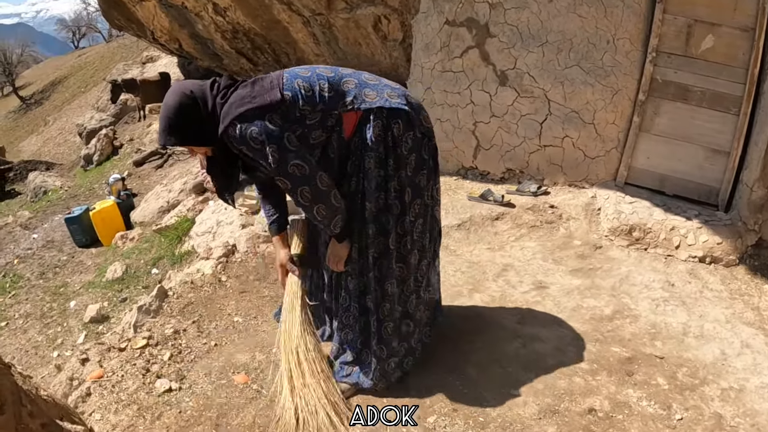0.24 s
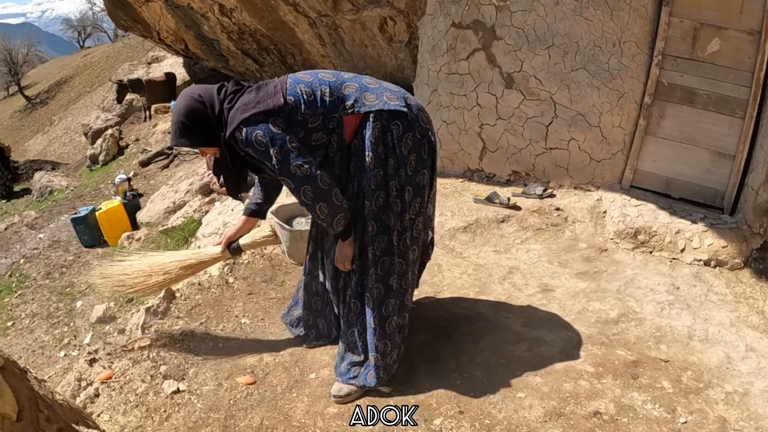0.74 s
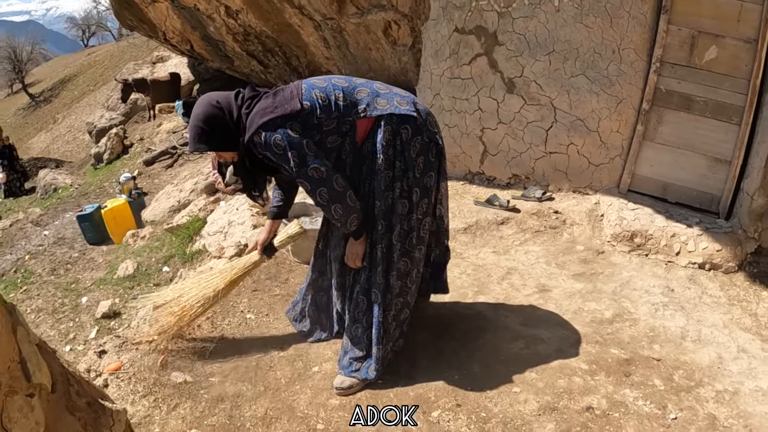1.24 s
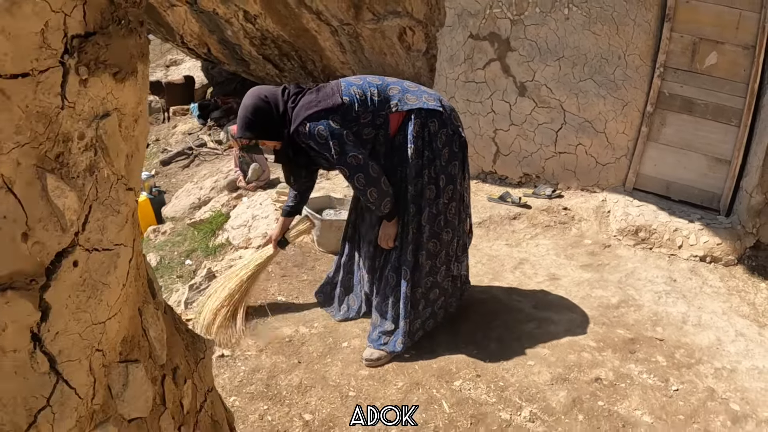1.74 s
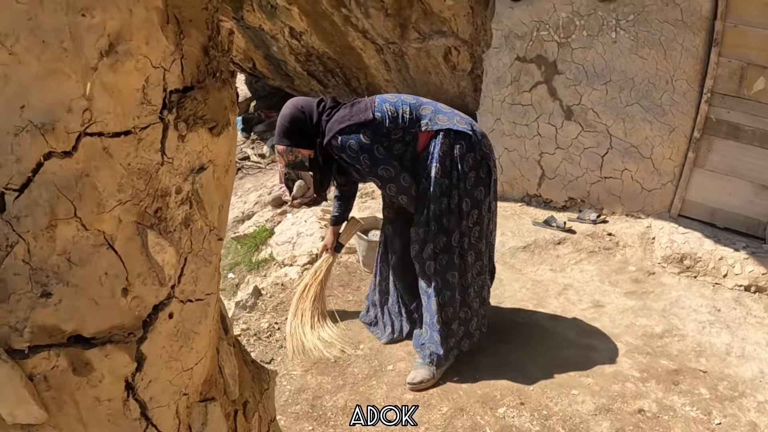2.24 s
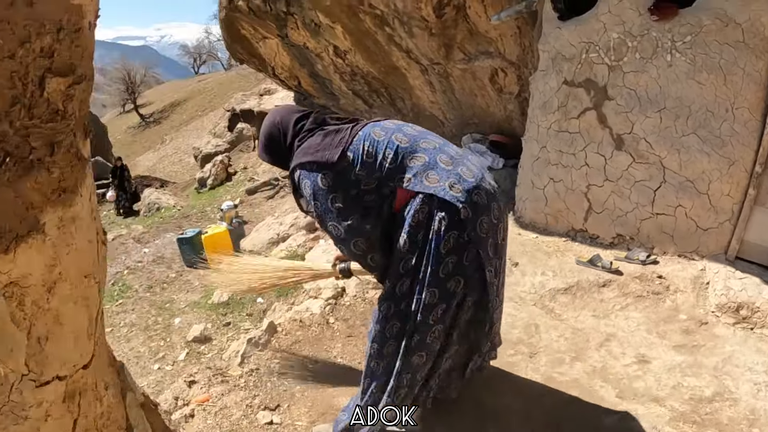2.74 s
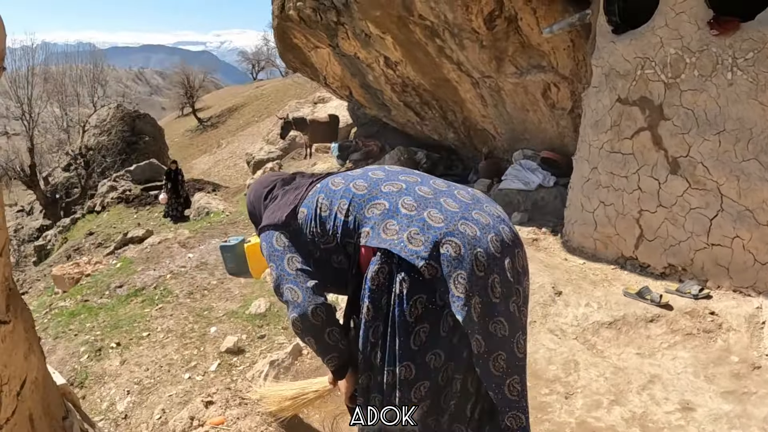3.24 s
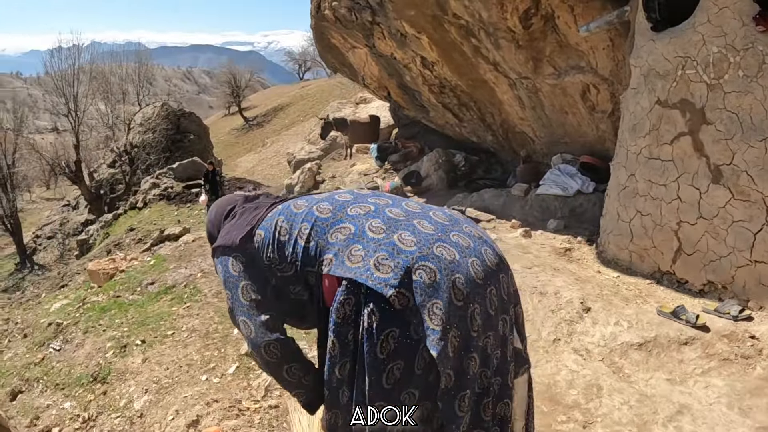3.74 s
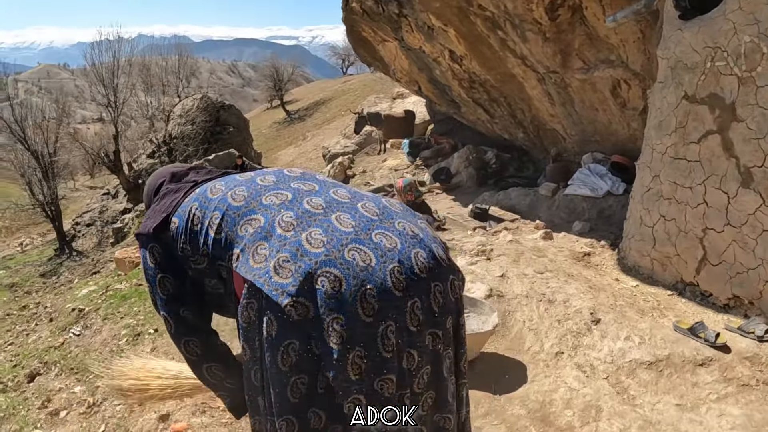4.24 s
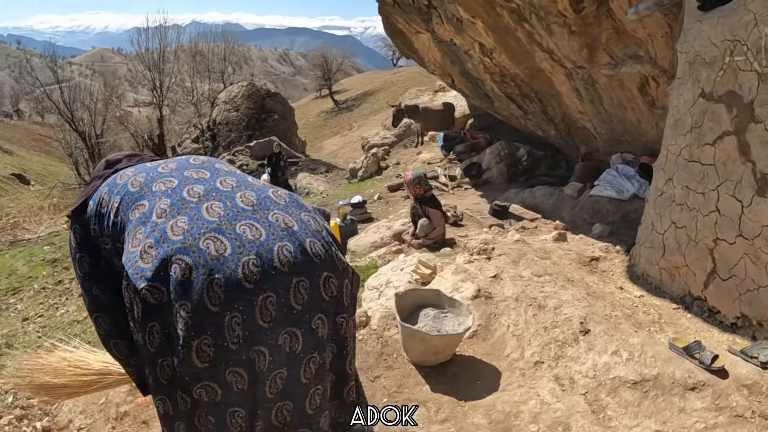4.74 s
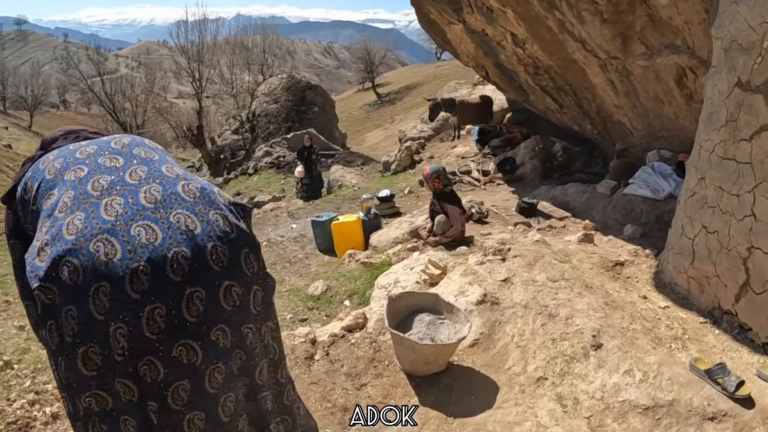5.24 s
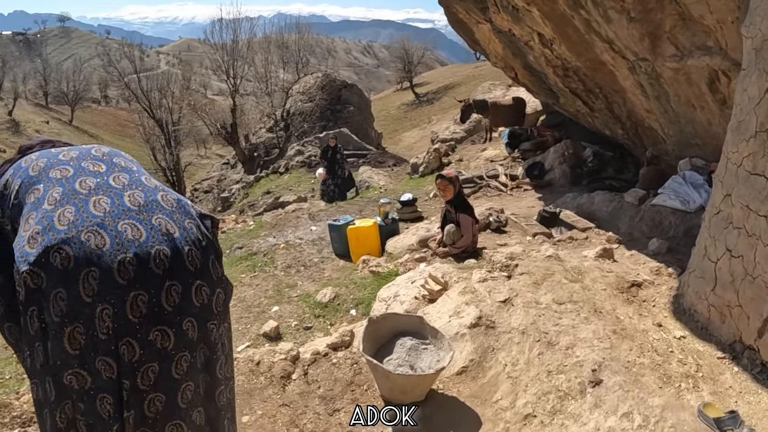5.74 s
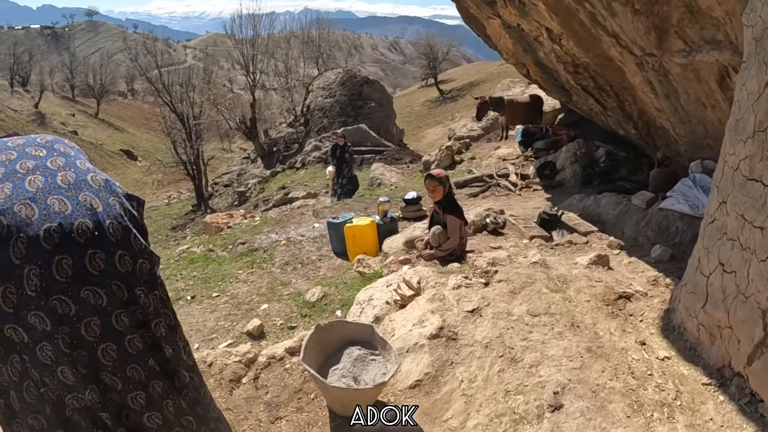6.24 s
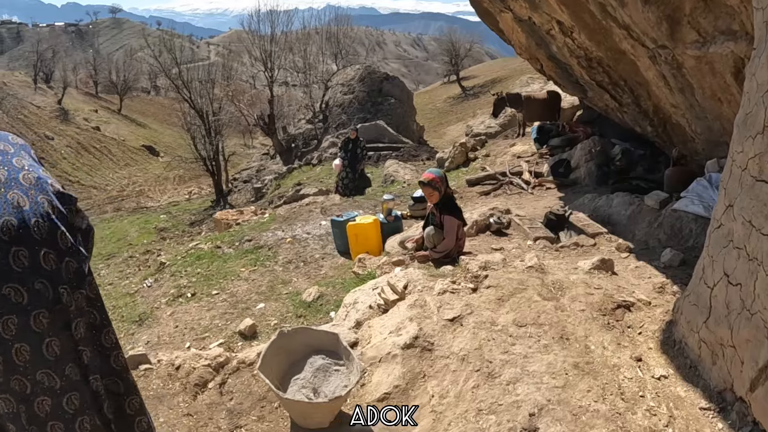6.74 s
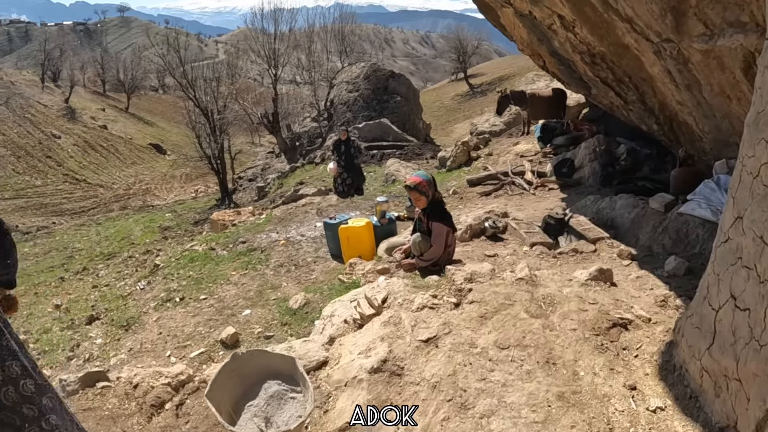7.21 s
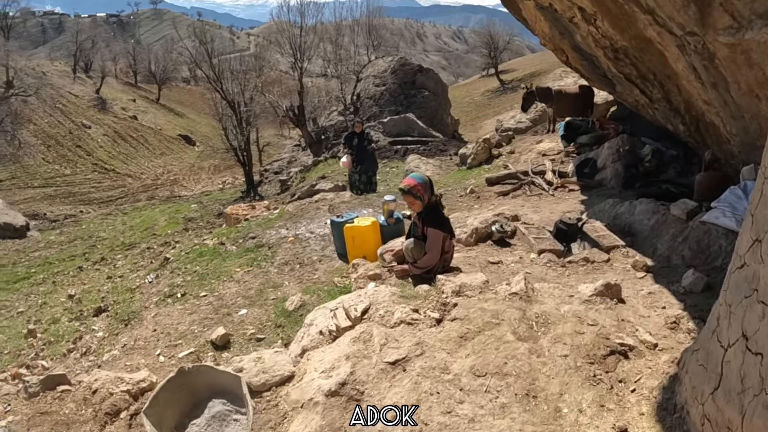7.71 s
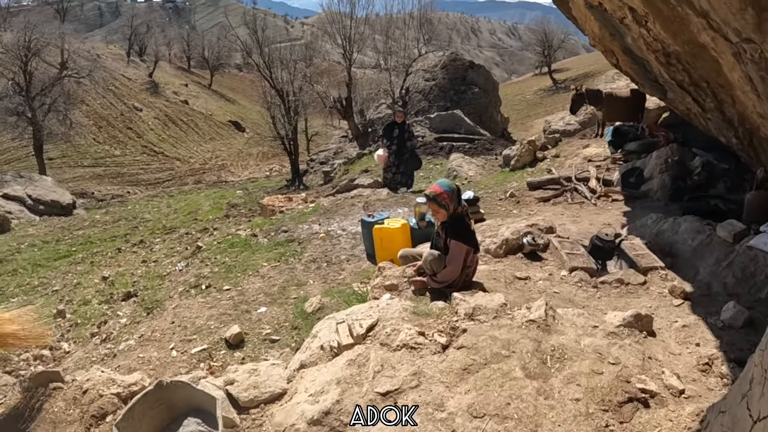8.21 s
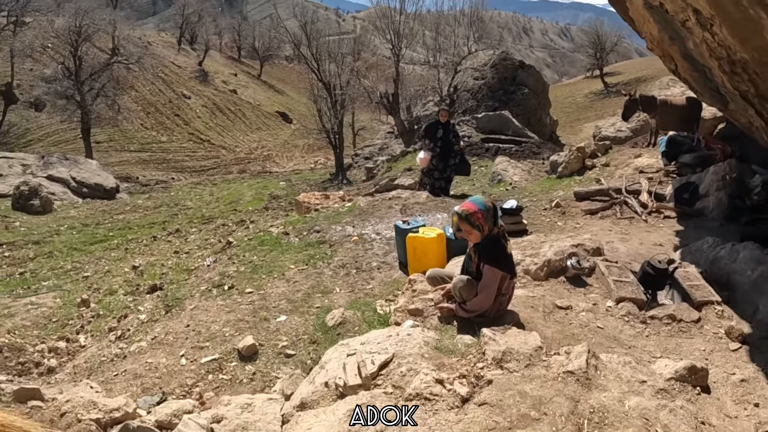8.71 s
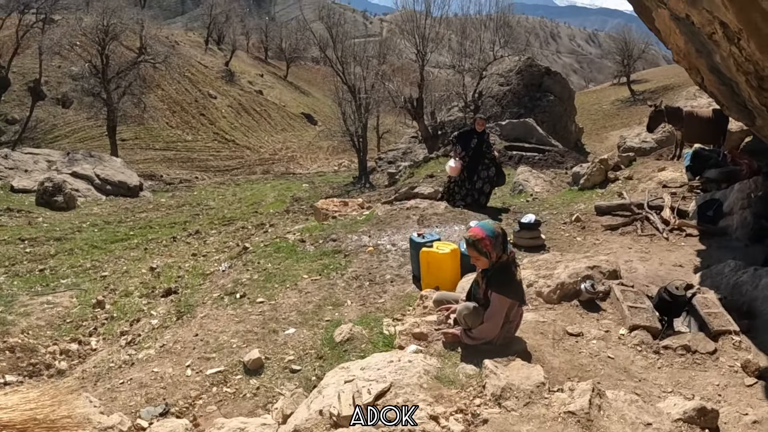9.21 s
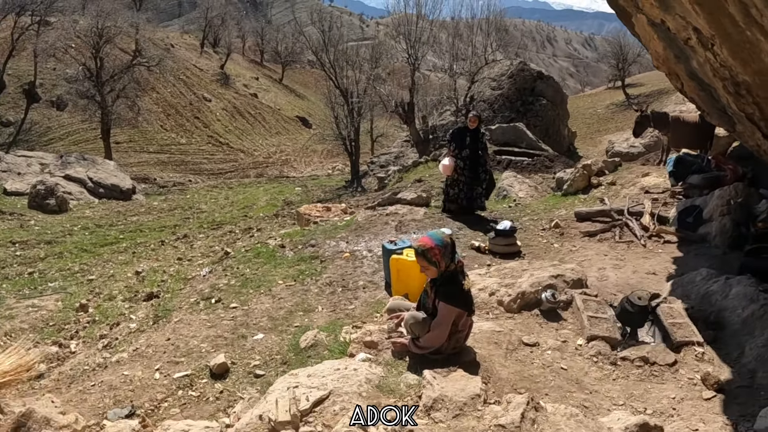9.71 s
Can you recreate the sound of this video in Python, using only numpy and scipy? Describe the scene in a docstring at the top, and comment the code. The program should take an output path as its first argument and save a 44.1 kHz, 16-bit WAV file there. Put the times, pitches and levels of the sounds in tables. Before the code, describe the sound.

Close, dry sweeping of stiff straw over loose dirt: bright gritty hiss with a coarser scrape beneath and tiny straw ticks. Strokes come irregularly, some long, some only short dabs. Stray pebbles snap, one rings briefly around six seconds, and clods thud more often near the end. A rock wall gives a very short scattered echo; low wind puffs bump the stereo microphone outdoors.

```python
"""Straw broom on dry dirt

A short straw broom sweeps dry dirt in quick strokes beside a rock wall, outdoors.
Shaped noise makes the grit's hiss, the deeper scrape and the fine dust; short blips tick as straws flick free.
Pebbles snap and clods thud as damped blips with loose crumbs, one hard pebble rings, and straws squeak
as wavering tones. The wall sends each blow back as a scattered echo.
Filtered noise gives light wind rumble on the microphones, ground rumble and a faint hillside murmur."""
import sys
import numpy as np
from scipy import signal
from scipy.fft import rfft, irfft, next_fast_len
from scipy.io import wavfile
from scipy.ndimage import uniform_filter1d, map_coordinates

SR = 44100
rng = np.random.default_rng(int(sys.argv[2]) if len(sys.argv) > 2 else 0)


def field_ratio(decibels):
    """Amplitude ratio for a level in dB (20 dB per decade); scalars and array-likes work."""
    return 10 ** (np.asarray(decibels, dtype=float) / 20)


def transcribe(signal):
    """Save signal, clipped to [-1, 1], as a 16-bit WAV file at the path in sys.argv[1]."""
    frames = np.atleast_2d(signal).T
    limited = np.clip(frames, -1, 1)
    pcm = np.round(limited * 32767).astype(np.int16)
    wavfile.write(sys.argv[1], SR, pcm)


N = 439236

# Broom strokes. Each row: touch-down in seconds, drag length in seconds, hiss in dB at the start,
# hiss in dB at the lift, deep scrape in dB over the hiss.
BROOM_STROKES = [(-0.2, 0.21, -55, -45.5, -9), (0.27, 0.36, -44.5, -38.5, -8), (0.949, .17, -49.5, -44, -9),
                 (1.08, 0.18, -50.5, -41, -8), (1.515, 0.33, -48, -40.5, -7),
                 (2.138, 0.33, -47.5, -42.5, -8.5), (2.69, 0.039, -46, -57.5, 2),
                 (2.9, 0.09, -59.5, -53, -4), (3.075, .26, -51, -37, -7.5), (3.688, 0.24, -49, -42, -9.5),
                 (3.96, 0.16, -52.5, -38, -8), (4.34, 0.09, -54, -53, 2), (4.47, 0.26, -52, -40, -5.5),
                 (5.048, 0.4, -47.5, -48, -5.5), (5.609, 0.25, -48, -44, -8), (6.02, 0.033, -45, -57, -3),
                 (6.18, 0.16, -50.5, -45, -7), (6.46, 0.13, -47.5, -43.5, -4.5),
                 (6.85, 0.18, -54.5, -50.5, -8), (6.96, .27, -45, -48, -7.5), (7.52, 0.31, -52, -46, -6.5),
                 (8.14, 0.1, -65, -57, -5.5), (8.42, 0.043, -49, -57, -3), (8.613, 0.14, -53, -35.5, -8),
                 (8.85, 0.31, -45.5, -49, -10), (9.24, 0.071, -47, -56, -12.5),
                 (9.359, 0.058, -48, -40.5, -8.5), (9.5, 0.23, -50, -42, -5)]
# Straws on grit. Each row: frequency in Hz, level in dB.
HISS_SPECTRUM = [(880, -31.5), (1500, -27.5), (1800, -39), (1930, -20.5), (2470, -9.5), (2950, -4.5),
                 (4670, -4), (6830, -4.5), (10000, -13), (13000, -34), (22000, -120)]
# Dirt dragged along. Each row: frequency in Hz, level in dB.
SCRAPE_SPECTRUM = [(210, -58), (350, -35), (384, -23.5), (618, -20), (841, -13), (1380, 0), (2200, -1),
                   (2860, -4), (4840, -120)]
# Finest dust. Each row: frequency in Hz, level in dB.
SPARKLE_SPECTRUM = [(4710, -21.5), (8000, -7), (9860, -11.5), (13300, -16), (14500, -37), (15600, -29)]
# Finest dust over time, at a hiss of -45 dB. Each row: time in seconds, level in dB over the hiss.
SPARKLE_LEVEL = [(0, -3), (2.4, -2), (3.3, -2.5), (4.8, -1.5), (5.2, -4.5), (6.6, -5.5), (8.4, -7),
                 (8.8, -2.5), (9.96, -3.5)]
# Place of the broom between the speakers. Each row: time in seconds, left over right in dB.
BROOM_PLACE = [(0, -0.5), (3, -1), (6.2, 0.5), (6.8, -1), (8.3, 2), (8.8, 2), (9.96, 0.5)]
# Wind on the microphones. Each row: frequency in Hz, level in dB.
RUMBLE_SPECTRUM = [(8.8, -23), (15, 15), (40, 6), (52, -19), (81, -43.5), (110, -40), (140, -66),
                   (240, -120)]
# Hard gusts. Each row: frequency in Hz, level in dB.
GUST_SPECTRUM = [(30, -42), (55, 5), (90, -15), (140, -10), (300, -33.5), (600, -120)]
# Puffs of wind. Each row: time of the peak in seconds, rumble in dB, time from the peak to 1/e power in seconds.
WIND_PUFFS = [(0.498, -41.5, 0.11), (0.73, -34.5, 0.048), (1.16, -50, 0.12), (1.464, -44, 0.087),
              (1.86, -44.5, 0.096), (2.305, -48, 0.074), (3.03, -53.5, 0.11), (4.32, -46.5, 0.09),
              (4.704, -43, 0.081), (5.316, -46, 0.13), (6.296, -41, 0.094), (6.633, -40.5, 0.067),
              (6.993, -41.5, .08), (7.805, -42, .04), (8.21, -55, 0.1), (8.6, -42, 0.09),
              (9.21, -51, 0.032), (9.585, -43, 0.093), (9.76, -40, 0.035), (9.902, -40, 0.038)]
# Ground rumble. Each row: frequency in Hz, level in dB.
GROUND_SPECTRUM = [(59, -44), (100, -35), (151, -4.5), (177, 2), (270, -6.5), (450, -17), (580, -12),
                   (990, -120)]
# Far hillside. Each row: frequency in Hz, level in dB.
MURMUR_SPECTRUM = [(180, -31), (300, 5.5), (828, -7), (1040, 6), (1470, -4), (6950, 1), (11900, -8),
                   (15000, -22)]
# Pebble snaps. Each row: first touch in seconds, level in dB, pitch in Hz, loose crumbs in dB.
PEBBLE_SNAPS = [(0.0878, -24, 6300, -17), (0.191, -33, 6000, -18), (0.233, -37, 9500, -14),
                (0.6252, -15, 5530, -22), (0.8912, -8, 4700, -15.5), (1.1292, -17.5, 3120, -17),
                (1.1344, -26, 4470, -22), (1.15, -26, 3490, -9), (2.7066, -36, 2720, 0),
                (2.7233, -25, 2700, -5), (2.917, -30, 6360, -17), (2.9656, -28.5, 5040, -10),
                (3.547, -24.5, 6250, -19), (4.3585, -34, 5080, -10), (4.9206, -23.5, 6560, -26),
                (4.9304, -22, 7000, -30), (5.0647, -30.5, 2160, -17), (5.628, -34, 6290, 0.5),
                (5.934, -29, 4930, -16), (7.421, -38, 7000, -20), (7.441, -27, 5200, -11),
                (7.4819, -32, 6130, -16), (8.003, -36, 1800, -12), (8.053, -38, 4500, -8),
                (8.103, -43.5, 2037, -14), (8.1911, -25.5, 1560, -24), (8.463, -31, 6000, -22),
                (8.5099, -25, 3100, -19), (8.6393, -33, 2500, -21), (9.39, -21.5, 6460, -9),
                (9.6002, -17.5, 1670, -6.5)]
# Thuds of the broom bundle on clods. Each row: first touch in seconds, level in dB,
# then the low, high and crack modes in dB over the middle one.
CLOD_THUDS = [(0.317, -48, -22, -5, 13), (0.623, -35.5, -5.5, -8, 3), (1.132, -41.5, -13, 1, -3),
              (4.651, -29.5, -2.5, -10, -8), (5.091, -50, -26, 2, 5), (5.8, -30, -6.5, 1, -13),
              (6.443, -48, -8, 1, -4), (6.91, -51, -19, 1, -3), (7.248, -42.5, -28, 5, 2),
              (8.191, -34, -8.5, -4, 7), (8.706, -34, -7.5, 2.5, -1), (9.15, -29.5, -15, -3, -4),
              (9.601, -25, -12, 1.5, 7.5)]
# Broom bundle on hard dirt, low to crack. Each row: mode in Hz, length in cycles, t60 of the crumbs in seconds.
BUNDLE_MODES = [(192, 1.8, 0.088), (520, 1.47, 0.05), (1184, 2.7, 0.035), (2300, 0.86, 0.02)]
# Soft low bumps, perhaps footfalls. Each row: start in seconds, level in dB.
SOFT_BUMPS = [(0.425, -39.5), (3.055, -47.5), (4.524, -44.5), (6.99, -48), (7.17, -45), (7.54, -52)]
# One hard pebble that rings. Each row: first touch in seconds, level in dB.
HARD_PEBBLE = [(6.1757, -19.5)]
# Modes of the hard pebble. Each row: frequency in Hz, level in dB, t60 in seconds.
PEBBLE_MODES = [(5850, -7, 0.017), (7180, 4.5, 0.0074)]
# Squeaks of straw on stone. Each row: start in seconds, level in dB, pitch in Hz, length in seconds.
STRAW_SQUEAKS = [(5.025, -48.5, 2020, 0.043), (6.399, -47.5, 1880, 0.052), (6.498, -46, 613, 0.049),
                 (6.547, -48, 1068, 0.061), (8.797, -44.5, 1805, 0.12)]
# Echo off the rock. Each row: frequency in Hz, t60 in seconds.
WALL_DECAY = [(200, 0.19), (2000, 0.064), (10000, 0.068)]
# Likeness of left and right. Each row: frequency in Hz, correlation from 0 to 1.
PAIR_LIKENESS = [(40, 0.85), (300, 0.63), (2000, 0.75), (8000, 0.85), (13000, 0.48)]
# Balance of the microphone pair. Each row: frequency in Hz, left over right in dB.
PAIR_BALANCE = [(40, -4.5), (200, -2), (1500, 0), (5000, 1), (12000, 5)]
# Treble steps of the microphones. Each row: frequency in Hz, level in dB.
TREBLE_SHELF = [(7500, -1), (8100, -4.5), (9800, -2.5), (10300, -4)]


def unit(x):
    """Scales a sound to rms 1."""
    return x / np.sqrt(np.mean(x ** 2) + 1e-20)


def along(points, hz):
    """Reads (Hz, value) points on a log frequency axis."""
    f, v = np.transpose(points)
    return np.interp(np.log(hz + 1), np.log(f + 1), v)


def curves(rows):
    """Draws one value per sample for each column after the time."""
    s, *cols = np.transpose(rows)
    return [np.interp(np.arange(N) / SR, s, c) for c in cols]


def wobble(rate):
    """A smooth random curve with rate knots a second."""
    knots = rng.standard_normal(int(N * rate / SR) + 4)
    return map_coordinates(knots, [np.arange(N) * rate / SR])


def filtered(x, response):
    """Shapes x by a gain that depends on frequency."""
    m = next_fast_len(N + 8192)
    return irfft(rfft(x, m) * response(np.fft.rfftfreq(m, 1 / SR)), m)[..., :N]


def sides(pan_db):
    """Left and right gains for a left-over-right level."""
    return field_ratio(np.array([pan_db / 2, -pan_db / 2]))


def spread(pair, spectrum):
    """Colours two unrelated signals and mixes them to the likeness of the microphone pair, rms 1."""
    def mid_side(hz):
        turn = np.arccos(np.clip(along(PAIR_LIKENESS, hz), -1, 1)) / 2
        return field_ratio(along(spectrum, hz)) * [np.cos(turn), np.sin(turn)]
    mid, side = filtered(pair, mid_side)
    return unit(np.array([mid + side, mid - side]))


def grit(spiky_db, patchy_db):
    """Dense contacts, a few much larger than the rest, in patches of pitch and time."""
    sizes = field_ratio(spiky_db * np.minimum(rng.exponential(size=N), 6))  # the cap is the coarsest grit
    z = signal.stft(sizes * rng.standard_normal((2, N)), nperseg=256)[2]
    patches = uniform_filter1d(rng.standard_normal(z.shape[1:]), size=5, axis=0)  # over pitch
    patches = uniform_filter1d(patches, size=9, axis=1)  # over time
    return signal.istft(z * field_ratio(patchy_db * unit(patches)), nperseg=256)[1][:, :N]


def blip(hz, cycles):
    """A contact too damped to ring: a short sine under a smooth hump."""
    u = np.arange(round(3 * cycles * SR / hz)) * hz / SR / cycles
    hump = (np.e * 2 * u * np.exp(-2 * u)) ** 2
    return np.sin(2 * np.pi * cycles * u) * hump


def strokes():
    """Hiss level and scrape share: strokes land, change evenly, then fade fast as some dust settles slowly."""
    s, drag, first_db, last_db, scrape_db = np.transpose(BROOM_STROKES)[:, :, None]
    clock = np.arange(0, N + 64, 64) / SR
    t = np.maximum(clock - s, 0)
    after_lift = np.maximum(t - drag, 0)
    landing = 1 - np.exp(-(t / 0.024) ** 0.82)  # time constant in seconds
    press = field_ratio(first_db + (last_db - first_db) * np.minimum(t / drag, 1))
    fade = field_ratio(-100 * after_lift) + field_ratio(-19.5 - 24 * after_lift)  # straws, then dust, in dB per second
    power = (landing * press * fade) ** 2
    total = power.sum(axis=0) + 1e-9
    share_db = (power * scrape_db).sum(axis=0) / total
    return curves(np.transpose([clock, 10 * np.log10(total), share_db]))


def ticks(per_s, spiky_db):
    """Single straws flick free: sparse blips in four sizes, per_s of each size, rms 1."""
    flicks = (rng.random((4, N)) < per_s / SR) * field_ratio(spiky_db * rng.standard_normal((4, N)))
    pitches_hz = [1510, 2620, 4360, 6800]
    return unit(sum(signal.fftconvolve(f, blip(hz, cycles=1.3))[:N] for f, hz in zip(flicks, pitches_hz)))


def broom(hiss_db, press_db):
    """Straws drag over grit; bundles of straws catch unevenly, so the level flutters."""
    sparkle_db, = curves(SPARKLE_LEVEL)
    effort_db = hiss_db + 45
    sway = sides(curves(BROOM_PLACE)[0] + 0.6 * wobble(3))
    catch_db = 0.96 * wobble(14) + 0.97 * wobble(36) + 0.49 * wobble(70)
    hiss = spread(grit(spiky_db=2.5, patchy_db=1.5), HISS_SPECTRUM)
    # all layers follow the hiss; effort tilts scrape and ticks down a little, sparkle up
    scrape = spread(grit(spiky_db=3.0, patchy_db=2.5), SCRAPE_SPECTRUM)
    scrape = scrape * field_ratio(press_db - 0.01 * effort_db + 0.33 * wobble(25))
    sparkle = spread(grit(spiky_db=3.0, patchy_db=2.0), SPARKLE_SPECTRUM)
    sparkle = sparkle * field_ratio(sparkle_db + 0.36 * effort_db)
    flicks = field_ratio(-16.5 - 0.37 * effort_db) * ticks(per_s=71, spiky_db=5)
    return field_ratio(hiss_db + catch_db) * sway * (hiss + scrape + sparkle + flicks)


def wind_strength():
    """Level of the wind in dB: a calm rumble with bell-shaped puffs, in lumps."""
    s, db, length = np.transpose(WIND_PUFFS)[:, :, None]
    clock = np.arange(0, N + 64, 64) / SR
    puffs = field_ratio(2 * db) * np.exp(-((clock - s) / length) ** 2)
    power = field_ratio(2 * -55.5) + puffs.sum(axis=0)  # calm at -55.5 dB
    return curves(np.transpose([clock, 10 * np.log10(power)]))[0] + 3 * wobble(9)


def wind():
    """Wind rumbles on the microphones as low noise; stronger gusts reach higher in pitch."""
    wind_db = wind_strength()
    rumble = field_ratio(wind_db) * spread(rng.standard_normal((2, N)), RUMBLE_SPECTRUM)
    gust_db = -63.5 + 1.6 * (wind_db + 46.5)  # grows faster than the rumble
    return rumble + field_ratio(gust_db) * spread(rng.standard_normal((2, N)), GUST_SPECTRUM)


def ground(hiss_db):
    """The ground rumbles as uneven low noise that swells slightly with the strokes."""
    level_db = -68 + 0.17 * (hiss_db + 49.5) + 3.15 * wobble(14)
    return field_ratio(level_db) * spread(rng.standard_normal((2, N)), GROUND_SPECTRUM)


def murmur():
    """The far hillside is a smooth, steady noise."""
    return field_ratio(-63.5) * spread(rng.standard_normal((2, N)), MURMUR_SPECTRUM)


def crumble(hz, cycles, t60, loose_db):
    """One firm contact, then loose crumbs of the same size that die away."""
    t = np.arange(SR // 12) / SR
    contacts = field_ratio(loose_db - 60 * t / t60) * rng.standard_normal(len(t)) * np.sqrt(hz / SR)
    contacts[0] = 1
    return signal.fftconvolve(contacts, blip(hz, cycles))[:len(t)]


def add(out, s, blow, pan_db, wall_db):
    """Places a blow with its own scattered echo off the rock, some metres away."""
    hz, t, z = signal.stft(rng.standard_normal((3, SR // 5)), SR, nperseg=128)
    decay = field_ratio(-60 * t / along(WALL_DECAY, hz)[:, None])
    shared, *own = signal.istft(z * decay, SR, nperseg=128)[1]
    tail = (shared + 0.54 * np.array(own)) / np.linalg.norm(shared)
    delayed = np.pad(blow, (round(0.012 * SR), 0))  # seconds to the wall and back
    echo = signal.fftconvolve(delayed[None], tail, axes=1)
    at = round(s * SR)
    out[:, at:at + len(blow)] += sides(pan_db)[:, None] * blow
    out[:, at:at + echo.shape[1]] += field_ratio(wall_db) * echo


LEAD_S = 0.0014  # a hard blow builds up for a moment after first touch


def snaps():
    """Pebbles snap for a cycle or so, with a sharp edge that shows more on duller ones."""
    out = np.zeros((2, N + SR))
    for s, db, hz, loose_db in PEBBLE_SNAPS:
        edge_db = -19 - 8 * np.log2(hz / 3000)  # dB per octave
        edge = field_ratio(edge_db) * crumble(6700, cycles=1.0, t60=0.015, loose_db=9)
        snap = crumble(hz, cycles=1.0, t60=0.042, loose_db=loose_db) + edge
        add(out, s + LEAD_S, field_ratio(db) * snap, pan_db=-0.8, wall_db=-10)
    return out[:, :N]


def thuds():
    """Clods sound the broom bundle's dull modes, over one deep push of the ground."""
    out = np.zeros((2, N + SR))
    for s, db, low_db, high_db, crack_db in CLOD_THUDS:
        thud = field_ratio(-17) * crumble(86, cycles=1.4, t60=0.14, loose_db=-0.5)  # the ground
        for level, (hz, cycles, t60) in zip(field_ratio([low_db, 0, high_db, crack_db]), BUNDLE_MODES):
            thud += level * rng.choice([-1, 1]) * crumble(hz, cycles, t60, loose_db=-1.5)
        add(out, s + LEAD_S, field_ratio(db) * thud, pan_db=-0.6, wall_db=-12.5)
    return out[:, :N]


def bumps():
    """Soft low contacts, perhaps footfalls, each with crumbs."""
    out = np.zeros((2, N + SR))
    for s, db in SOFT_BUMPS:
        bump = crumble(180, cycles=1.7, t60=0.2, loose_db=-3)
        add(out, s, field_ratio(db) * bump, pan_db=-0.6, wall_db=-10.5)
    return out[:, :N]


def squeaks():
    """A straw judders on stone: a wavering tone under a short hump."""
    out = np.zeros(N)
    for s, db, hz, length in STRAW_SQUEAKS:
        u = np.arange(round(length * SR)) / (length * SR)
        drift = np.cumsum(rng.normal(0, 0.22, len(u)))  # radians
        tone = np.sin(2 * np.pi * hz * length * u + drift)
        out[round(s * SR):][:len(u)] += field_ratio(db) * np.sin(np.pi * u) * tone
    return out


def ring(hz, t60, t):
    """A damped mode: a sine that dies away evenly in dB."""
    return field_ratio(-60 * t / t60) * np.sin(2 * np.pi * hz * t)


def tink():
    """A hard pebble rings in its damped modes, with the contact itself on top."""
    out, t = np.zeros((2, N + SR)), np.arange(SR // 12) / SR
    for s, db in HARD_PEBBLE:
        tone = sum(field_ratio(level_db) * ring(hz, t60, t) for hz, level_db, t60 in PEBBLE_MODES)
        tone = tone * (1 - np.exp(-t / 0.00041))  # soft onset
        contact = 0.73 * crumble(4700, cycles=1.16, t60=0.0088, loose_db=-12)
        add(out, s + LEAD_S, field_ratio(db) * (tone + contact), pan_db=1.8, wall_db=-8)
    return out[:, :N]


def scene():
    """Broom, air and ground, then the blows and squeaks."""
    hiss_db, press_db = strokes()
    air = wind() + ground(hiss_db) + murmur()
    blows = snaps() + thuds() + bumps() + tink()
    return broom(hiss_db, press_db) + air + blows + squeaks()


def low_pass(x):
    """Removes everything above the highest recorded frequency."""
    return signal.sosfilt(signal.butter(12, 15700, fs=SR, output="sos"), x)


def record(dry):
    """The left microphone hears more treble and less bass than the right; nothing above the band limit."""
    def microphones(hz):
        return sides(along(PAIR_BALANCE, hz)) * field_ratio(along(TREBLE_SHELF, hz)) * (hz < 15720)
    return low_pass(filtered(dry, microphones))


dry = scene()
out = record(dry)
transcribe(out)
```